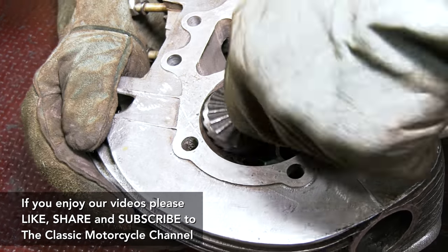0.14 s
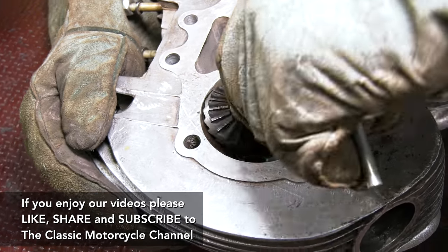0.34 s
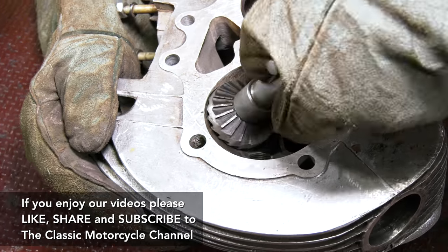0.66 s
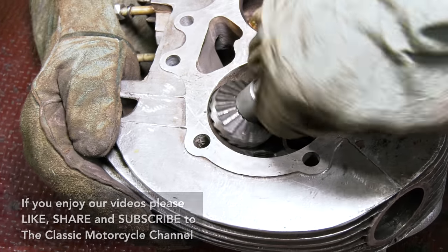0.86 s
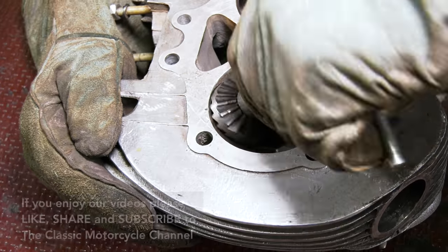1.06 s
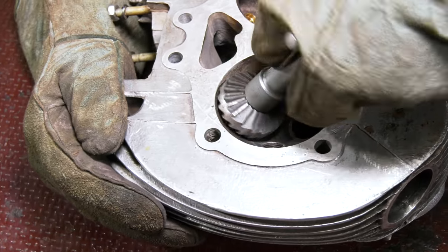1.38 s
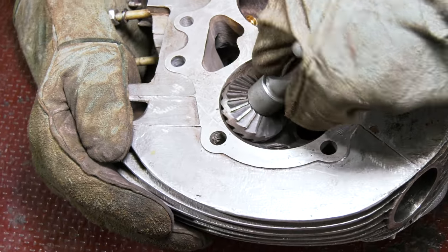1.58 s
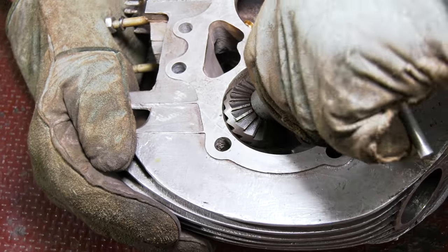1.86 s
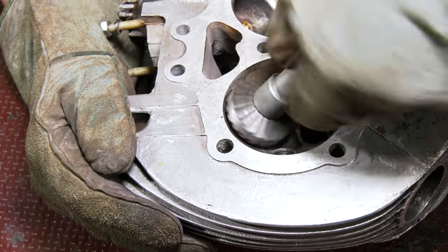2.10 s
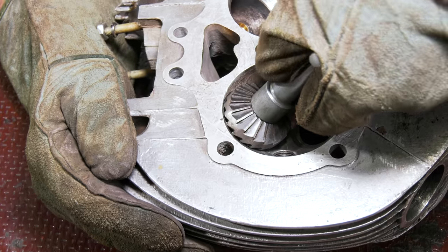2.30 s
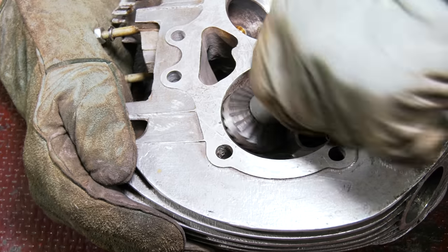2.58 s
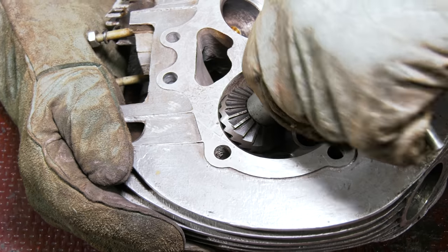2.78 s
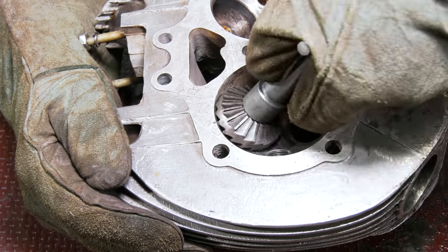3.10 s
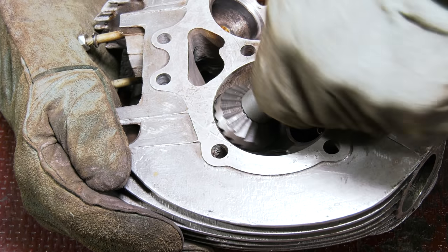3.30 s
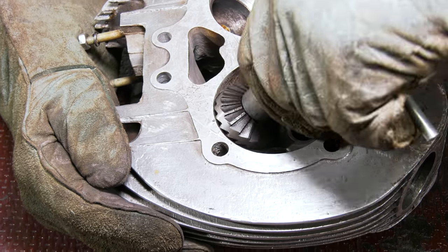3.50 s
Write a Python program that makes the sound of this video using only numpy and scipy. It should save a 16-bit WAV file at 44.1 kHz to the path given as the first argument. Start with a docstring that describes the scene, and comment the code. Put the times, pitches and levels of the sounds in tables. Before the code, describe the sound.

A hand-turned steel cutter grinds on a metal casting: five gritty, ringing rasps about 0.8 seconds apart, separated by hollow handle clunks and faint scratches, close-miked in a quiet workshop.

```python
"""In a quiet workshop, a toothed steel cutter is turned by hand on a valve seat in a cast metal cylinder head.
Friction noise, clumped by breaking chips, makes each of five turns rasp, ring the metal and rumble the bench.
Between turns the gloved hand lets go and grips the handle again: short pushes thump a hollow body.
Light scratches, metal catches, dry snaps and glove rubs join in; a decaying noise tail gives the room's
answer, and coloured noise makes the background hum."""
import sys
import numpy as np
from scipy import signal
from scipy.fft import rfft, irfft, next_fast_len
from scipy.io import wavfile
from scipy.ndimage import uniform_filter1d, map_coordinates

SR = 44100
rng = np.random.default_rng(int(sys.argv[2]) if len(sys.argv) > 2 else 0)


def makeup_ratio(level_db):
    """Linear amplitude ratio for a level in decibels (20 dB per factor of ten)."""
    decades = np.asarray(level_db, float) / 20
    return 10 ** decades


def wav_record(signal):
    """Record a signal, one row per channel, as 16-bit PCM in the file named by sys.argv[1]."""
    frames = np.transpose(np.atleast_2d(signal))
    bounded = np.clip(frames, -1, 1)
    # unit amplitude maps onto the largest positive 16-bit level
    quanta = np.round(bounded * 32767).astype(np.int16)
    wavfile.write(sys.argv[1], SR, quanta)


N = 160965  # length in samples

# The cut, one list a turn. Each row: time in seconds, rasp control level in dB,
# weight on the bench in dB over that level, bite into the casting in dB over that level.
TURNS = [
    [(0.0, -68, 21.5, 21.5), (0.058, -70.5, 21, 17), (0.07, -54.5, 14.5, 20), (0.106, -51.5, 19, 19),
     (0.17, -50, 17, 19), (0.212, -53, 20.5, 17), (0.232, -47.5, 18.5, 18.5), (0.296, -42, 16.5, 22.5),
     (0.345, -49, 14.5, 14.5), (0.362, -57, 18, 16), (0.42, -67.5, 9, 15), (0.458, -57.5, 10, -16),
     (0.488, -71.5, 16, 8), (0.51, -49, 24, 19.5), (0.552, -59.5, 1, -9), (0.572, -51.5, 13.5, 10.5),
     (0.652, -89, -5, 23), (0.69, -66.5, 38, 19), (0.71, -81, 25, -3), (0.73, -70, 17, -15),
     (0.754, -55.5, 11.5, -18), (0.84, -71, -3, -12)],
    [(0.845, -66, -2, -7), (0.877, -53, 16, 17), (0.901, -45, 16.5, 18.5), (1.029, -41, 15, 17),
     (1.085, -39.5, 15.5, 19), (1.132, -49.5, 14.5, 13.5), (1.142, -57, 18, 19), (1.159, -64, 7, 20),
     (1.201, -60.5, 33, 9), (1.273, -61, -11, -19), (1.293, -51, 20.5, 21), (1.371, -56.5, 6, -4),
     (1.433, -77, -1, 18), (1.467, -70, 10, -16), (1.489, -57, 13, 24), (1.547, -76, 22, 17),
     (1.559, -64, 16, 5), (1.593, -80, 37, 13), (1.607, -75, 2, 1), (1.62, -80, 8, 16)],
    [(1.625, -76, 12, 10), (1.669, -49, 16.5, 19.5), (1.719, -42, 10.5, 17), (1.737, -45.5, 18, 16.5),
     (1.815, -38.5, 16.5, 17.5), (1.861, -37.5, 17, 18), (1.951, -59.5, 14, 11), (2.025, -63.5, 11, 12),
     (2.057, -82, 17, -4), (2.069, -59, 19.5, 25), (2.141, -56.5, 10, -5), (2.179, -52, 5.5, -1),
     (2.215, -67, 18, 10), (2.241, -62, 18, 5), (2.257, -49, 8, 16), (2.277, -57, 18, 23.5),
     (2.391, -58.5, 9, 3), (2.4, -57, 18, 2)],
    [(2.405, -61.5, 5, 10), (2.453, -47, 13.5, 17), (2.493, -40, 13.5, 12), (2.589, -41.5, 16.5, 17),
     (2.631, -32.5, 12, 11), (2.707, -43, 11, 13), (2.737, -61.5, 16, 15), (2.775, -56.5, -8, 9),
     (2.795, -66, 14, 21), (2.849, -56, 5, -3), (2.875, -56.5, -2, -14), (2.891, -50, 22, 0),
     (2.913, -46, 10, 11.5), (3.009, -60, 8.5, -3), (3.037, -63.5, 35.5, 26), (3.093, -80, 23, 0),
     (3.117, -73, -10, -13), (3.18, -83, -1, 4)],
    [(3.185, -81, 8, -14), (3.227, -58, -3, 12), (3.243, -53.5, 13.5, 20), (3.267, -39.5, 12, 12),
     (3.305, -39.5, 13.5, 17.5), (3.331, -41, 15.5, 20), (3.347, -36.5, 12, 18.5), (3.377, -40, 12.5, 13),
     (3.389, -41.5, 16.5, 9), (3.423, -36, 13.5, 15), (3.451, -38, 17.5, 7.5), (3.485, -45, 13.5, 12),
     (3.515, -64.5, 23, 16), (3.561, -68, 22, 2), (3.641, -60, 14.5, -2), (3.65, -61, 15, 1)],
]
# Pitches in Hz of the ringing modes of casting and cutter.
METAL_HZ = [1780, 2222, 2306, 2519, 2622, 2738, 3115, 3205, 3300, 3685, 3841, 4290, 4640, 4904, 5408, 5619,
            5780, 6245]
# The same modes in order. Each row: free time to fall 60 dB in seconds,
# relative level in dB when rasped, at a release, and at a grip.
METAL_MODES = [(0.028, -20, -24, -5.5), (0.57, 8.5, -13, -6.5), (0.25, -16, -6, -4), (0.28, 0.5, -22, -21),
               (0.051, 2.5, 1, -17), (0.054, -1.5, 9.5, -4), (0.38, -8, -16, -19), (0.44, -11, -14, -17),
               (0.35, -6, -9, -28), (0.14, -22, 1, -15), (0.33, -4.5, -2, -17), (0.029, -21.5, 0, -23),
               (0.23, -10, -26, -25), (0.55, -7, -23, -24), (0.24, -11.5, -28, -34), (0.64, -12, -41, -23),
               (0.26, -12, -36, -29), (0.1, -20.5, -25, -30)]
# High resonances of the teeth. Each row: pitch in Hz, width in Hz, relative level in dB.
TEETH_PEAKS = [(6400, 34, -11), (6920, 26, 2.5), (7100, 17, -15), (8070, 500, -12.5), (8530, 20, 0),
               (9040, 56, -2.5), (9350, 80, -7.5), (10080, 430, -7), (11000, 78, -3.5), (11030, 98, -11),
               (11750, 53, -5.5), (12700, 45, -4), (13600, 61, -10), (14900, 49, -11)]
# Colour of the rasp. Each row: frequency in Hz, relative level in dB per Hz.
RASP_COLOUR = [(410, -77), (700, -7), (1030, -5), (1450, -15), (2260, -3.5), (2700, -8), (3390, -26.5),
               (3520, -24), (4750, -15.5), (7400, -26), (12300, -28), (15800, -40)]
# Colour of the bench rumble. Each row: frequency in Hz, relative level in dB per Hz.
BENCH_COLOUR = [(15, -51), (25, -27.5), (68, -8), (156, -7), (316, -6), (356, -1.5), (810, -6.5),
                (1030, -6.5), (1500, -10), (1950, -10), (3300, -120)]
# Resonances of the bench. Each row: pitch in Hz, width in Hz, relative level in dB.
BENCH_MODES = [(108.3, 54, -8), (250, 63, 4), (373.6, 13, -5), (417, 56, -6), (617, 24, -3.5),
               (903, 43, -8.5)]
# The teeth skate lightly back over the seat.
# Each row: peak time in seconds, level in dB, rise in seconds, fall in seconds.
SKATES = [(.52, -46, 0.0077, 0.072), (.755, -52, 0.019, 0.053), (1.33, -49.5, 0.035, 0.067),
          (2.13, -45.5, 0.032, 0.056), (2.91, -35, 0.041, 0.041)]
# Resonances of the skating scratch. Each row: pitch in Hz, width in Hz, relative level in dB.
SKATE_PEAKS = [(2500, 700, -1), (3700, 120, -2), (4500, 400, 0), (5010, 400, -1), (6300, 900, -7),
               (8060, 120, -9), (9250, 120, -7), (9900, 300, -10)]
# A tooth catches and the casting rings free. Each row: start in seconds, ring level in dB.
SNAGS = [(.262, -20.5), (.3, -18), (1.0, -40), (1.075, -28), (1.78, -14.5), (1.826, -20), (1.862, -39),
         (2.642, -12), (3.305, -22), (3.495, -30.5)]
# A chip snaps. Each row: start in seconds, peak in dB, pitch in Hz.
TICKS = [(.347, -21, 1400), (1.134, -22, 1600), (1.187, -24, 900), (1.297, -21, 3000), (1.359, -27, 2500),
         (1.59, -29, 1000), (3.428, -14, 2000)]
# The hand lets go and the handle rocks. Each row: start in seconds, thump peak in dB, ring in dB over the
# thump, ring brightness in dB per octave, thump brightness in dB per octave.
RELEASES = [(.5, -23, -42, -5, -2), (.5065, -16.5, -16.5, -19, -2), (1.294, -20, -24, -2, -10),
            (1.298, -7.5, -43, -11, 6.5), (2.068, -33, -14, 9, 13), (2.0715, -7.5, -16.5, -4.5, 2)]
# The palm takes the handle again. Each row: start in seconds, thump peak in dB, ring in dB over the
# thump, ring brightness in dB per octave, thump brightness in dB per octave.
GRIPS = [(.684, -10.5, -46, 6, -10), (1.49, -4, -18.5, -7, 1.5), (2.2515, -3, -13, -5, 2),
         (2.893, -20, -17, 0, -1), (2.9, -10.5, -21, 1, -4), (3.03, -6, -30.5, -17, -1.5)]
# Hollow body at a release. Each row: pitch in Hz, width in Hz, relative level in dB.
RELEASE_BODY = [(133, 98, 0.5), (770, 200, -2.5), (1140, 160, 5)]
# Hollow body at a grip. Each row: pitch in Hz, width in Hz, relative level in dB.
GRIP_BODY = [(681, 180, 11), (1004, 238, 10.5), (1246, 196, 1.5), (1686, 210, -2.5)]
# Colour of the bench after a knock. Each row: frequency in Hz, relative level in dB per Hz.
SCUFFLE_COLOUR = [(35, -49), (60, 7), (219, 9), (295, -1), (639, 7.5), (1810, -18), (2100, -27),
                  (2730, -59), (4620, -120)]
# Colour of the loose cutter after a blow. Each row: frequency in Hz, relative level in dB per Hz.
CLATTER_COLOUR = [(1200, -49), (2200, 0.5), (3900, 0.5), (6200, -8), (7500, -29), (15000, -28)]
# The glove rubs the handle. Each row: start in seconds, level in dB, time to fall 60 dB in seconds.
RUBS = [(1.187, -26, 0.43), (2.93, -48, .15)]
# Colour of the glove rubs. Each row: frequency in Hz, relative level in dB per Hz.
RUB_COLOUR = [(88, -50), (150, -22), (260, -5), (489, -9), (571, 5), (1240, -4), (2600, -14), (3380, -24),
              (5720, -120)]
# How fast the room's answer dies. Each row: frequency in Hz, time to fall 60 dB in seconds.
ROOM_DECAY = [(200, 0.73), (2000, 0.056), (10000, 0.27)]
# Colour of the workshop's hum. Each row: frequency in Hz, relative level in dB per Hz.
SHOP_COLOUR = [(15, -25), (25, 4), (291, -10.5), (977, -6.5), (1150, -6), (1550, -14), (1770, -12),
               (1970, -16), (3970, -21.5), (11700, -30), (15700, -36)]

CHIPS_PER_S, CHIP_SPREAD_DB, CHIP_SHARE = 2200, 4, 0.55  # share of the power; the rest is hiss
CLUMP_PER_S, CLUMP_DEPTH = 70, 0.6  # chips come in bunches
RING_DB, TEETH_DB, RASP_DB = 1, -3.5, 10.5  # added to the rasp control level
FLUTTER_DB = 1.2
CHATTER_DB, CHATTER_PER_S = 1.7, 150
PRESSED = 0.2  # share of the free ring time left under the teeth
SHIFT = 0.0028  # scale of the pitch shift as the cutter's seat moves
BENCH_FLAT = 0.71  # share that passes between the bench's modes
PATCH_DB = 2  # strength of the random gain patches
CONTACT_S, CRACK_HZ = 0.0011, 3500
CLATTER_DB, CLATTER_T60_S = -10.5, 0.14  # over the ring
SCUFFLE_DB, SCUFFLE_T60_S = -26.5, 0.29  # over the thump
ROOM_DB, SHOP_DB = -17, -46.5
CLIP, TOP_HZ = 0.6, 15750  # peak limit in full scale, highest frequency kept


def unit(x):
    """Scales a sound to rms 1."""
    return x / np.sqrt(np.mean(x ** 2) + 1e-20)


def along(points, hz):
    """Reads a curve of (Hz, value) points on a log frequency axis."""
    f, v = np.transpose(points)
    return np.interp(np.log(hz + 1), np.log(f + 1), v)


def wobble(rate):
    """Draws a smooth random curve with the given number of knots a second."""
    knots = rng.standard_normal(int(N * rate / SR) + 4)
    return map_coordinates(knots, [np.arange(N) * rate / SR])


def filtered(x, response):
    """Shapes a sound by a complex response of frequency."""
    m = next_fast_len(len(x) + SR // 2)
    return irfft(rfft(x, m) * response(np.fft.rfftfreq(m, 1 / SR)), m)[:len(x)]


def coloured(x, spectrum):
    """Gives a sound a (Hz, dB) colour and rms 1."""
    return unit(filtered(x, lambda hz: makeup_ratio(along(spectrum, hz))))


def resonances(peaks):
    """Response of resonances, each (Hz, width Hz, peak dB), with alternating sign."""
    def response(f):
        total = 0
        for k, (hz, width, db) in enumerate(peaks):
            damping = 1j * f * width
            total = total + (-1) ** k * makeup_ratio(db) * damping / (hz * hz - f * f + damping)
        return total
    return response


def patchy(x, size):
    """Lets resonances come and go: a random gain over time and frequency."""
    z = signal.stft(x, nperseg=size)[2]
    field = uniform_filter1d(rng.standard_normal(z.shape), size=3, axis=0)
    field = uniform_filter1d(field, size=5, axis=1)
    return signal.istft(z * makeup_ratio(PATCH_DB * unit(field)), nperseg=size)[1][:N]


def chips():
    """Friction force: hiss mixed with bunches of small chip impulses of uneven size and random sign."""
    spread = np.clip(rng.standard_normal(N), -2, 2)
    size = makeup_ratio(CHIP_SPREAD_DB * spread) * rng.choice([-1, 1], N)
    rate = CHIPS_PER_S * np.exp(CLUMP_DEPTH * wobble(CLUMP_PER_S))
    breaks = unit(size * (rng.random(N) < rate / SR))
    return np.sqrt(CHIP_SHARE) * breaks + np.sqrt(1 - CHIP_SHARE) * rng.standard_normal(N)


def metal_and_teeth(rasp_db, bite_db, chatter_db):
    """Friction rings the damped metal and the teeth while the cutter shifts between two seat positions."""
    seat = np.pi / 4 + 0.5 * np.tanh(wobble(15))
    ring = teeth = 0
    for side, share in ((-1.4, np.sin(seat)), (-0.37, np.cos(seat))):
        force = chips() * share * makeup_ratio(chatter_db)
        modes = []
        for hz, (t60, db, *_) in zip(METAL_HZ, METAL_MODES):
            shifted = hz * (1 + side * SHIFT * (t60 < 0.2))  # only short-lived modes move
            width = np.log(1000) / (np.pi * t60 * PRESSED)
            modes.append((shifted, width, db))
        metal = resonances(modes)
        driven = filtered(force * makeup_ratio(rasp_db + bite_db + RING_DB), metal)
        ring = ring + driven / np.std(filtered(force, metal))
        tips = resonances([(hz * (1 + side * SHIFT), width, db) for hz, width, db in TEETH_PEAKS])
        teeth = teeth + unit(filtered(force, tips)) * makeup_ratio(rasp_db + TEETH_DB)
    return 0.58 * (patchy(ring, size=512) + teeth)


def rasp(rasp_db):
    """The scrape itself: patchy, coloured friction noise that follows the cut."""
    scrape = coloured(patchy(chips(), size=512), RASP_COLOUR)
    return scrape * makeup_ratio(rasp_db + RASP_DB + FLUTTER_DB * wobble(60))


def bench(rasp_db, weight_db, chatter_db):
    """The bench rumbles as noise passes through its broad resonances."""
    noise = patchy(rng.standard_normal(N), size=1024)
    shake = filtered(noise, lambda f: BENCH_FLAT + np.abs(resonances(BENCH_MODES)(f)))
    level_db = rasp_db + weight_db + chatter_db + FLUTTER_DB * wobble(30.02)
    return coloured(shake, BENCH_COLOUR) * makeup_ratio(level_db)


def cutter():
    """The turning cutter drives rasp, metal, teeth and bench with one set of moving levels."""
    s, *columns = np.vstack(TURNS).T
    rasp_db, weight_db, bite_db = [np.interp(np.arange(N) / SR, s, c) for c in columns]
    rasp_db = rasp_db + FLUTTER_DB * wobble(45)
    chatter_db = CHATTER_DB * wobble(CHATTER_PER_S)
    metal = metal_and_teeth(rasp_db, bite_db, chatter_db)
    return metal + rasp(rasp_db) + bench(rasp_db, weight_db, chatter_db)


def skates():
    """Friction through high resonances makes a thin bright scratch that swells and fades."""
    t = np.arange(N) / SR
    shape = 0
    for s, db, rise, fall in SKATES:
        shape = shape + makeup_ratio(db) * np.exp(-(((t - s) / np.where(t < s, rise, fall)) ** 2))
    scratch = filtered(chips(), lambda f: resonances(SKATE_PEAKS)(f) * f / (f + 1500))  # less bass
    return unit(patchy(scratch, size=256)) * shape


def ringing(t, column, hard_db):
    """The metal's free modes die as sines of alternating sign; a higher hard_db favours high ones."""
    total = 0
    for k, (hz, mode) in enumerate(zip(METAL_HZ, METAL_MODES)):
        level_db = mode[column] + hard_db * np.log2(hz / METAL_HZ[1])
        total = total + (-1) ** k * makeup_ratio(level_db - 60 * t / mode[0]) * np.sin(2 * np.pi * hz * t)
    return total


def snags():
    """Catches under the rasp start softly and leave the casting ringing."""
    out, t = np.zeros(N + SR), np.arange(SR // 2) / SR
    for s, db in SNAGS:
        rise = 1 - np.exp(-t / 0.0038)
        out[round(s * SR):][:len(t)] += makeup_ratio(db) * ringing(t, column=3, hard_db=-29) * rise
    return out[:N]


def ticks():
    """Chips snap as dry, fast-fading noise through one wide resonance applied twice."""
    out, t = np.zeros(N), np.arange(SR // 50) / SR
    for s, db, hz in TICKS:
        burst = makeup_ratio(-60 * t / 0.004) * rng.standard_normal(len(t))
        snap = filtered(burst, lambda f: resonances([(hz, 1.6 * hz, 0)])(f) ** 2)
        out[round(s * SR):][:len(t)] += makeup_ratio(db) * snap / np.abs(snap).max()
    return out


def hollow_body(body, clack_db):
    """Response of a hollow body; clack_db per octave raises or lowers its modes above 700 Hz."""
    def response(f):
        total = 0
        for hz, width, db in body:
            bright_db = clack_db * max(np.log2(hz / 700), 0)
            total = total + makeup_ratio(db + bright_db) * resonances([(hz, width, 0)])(f) ** 2
        return total
    return response


def knocks(rows, body, column):
    """A building contact thumps the body, rings the metal, rattles the cutter and shakes the bench."""
    out, t = np.zeros(N + SR), np.arange(SR // 2) / SR
    shake = coloured(rng.standard_normal(N + SR), SCUFFLE_COLOUR)
    rattle = coloured(chips(), CLATTER_COLOUR)
    u = t / CONTACT_S
    rise, pulse = 1 - np.exp(-u), u * np.exp(-u)
    for s, db, ring_db, hard_db, clack_db in rows:
        i = round(s * SR)
        push = np.exp(-t / 0.00013) + 0.011 * pulse * rng.standard_normal(len(t))
        thump = filtered(push, hollow_body(body, clack_db))
        crack = filtered(pulse * rng.standard_normal(len(t)), lambda f: 1 / (1 + 1j * f / CRACK_HZ) ** 2)
        clatter = rattle[i:i + len(t)] * makeup_ratio(CLATTER_DB - 60 * t / CLATTER_T60_S) * rise
        ring = ringing(t, column, hard_db) * rise ** 2 + 2.06 * crack + clatter
        scuffle = shake[i:i + len(t)] * makeup_ratio(SCUFFLE_DB - 60 * t / SCUFFLE_T60_S) * rise
        out[i:i + len(t)] += makeup_ratio(db) * (thump / np.abs(thump).max() + makeup_ratio(ring_db) * ring + scuffle)
    return out[:N]


def rubs():
    """Glove friction is soft coloured noise that starts quickly, fades and flutters."""
    t = np.arange(N) / SR
    shape = 0
    for s, db, t60 in RUBS:
        start = np.clip((t - s) / 0.0013, 0, 1)
        shape = shape + makeup_ratio(db - 60 * np.abs(t - s) / t60) * start
    return coloured(chips(), RUB_COLOUR) * shape * makeup_ratio(2 * wobble(120))


def room(x):
    """The workshop answers with a noise tail in which each frequency dies at its own speed."""
    hz, t, z = signal.stft(rng.standard_normal(SR // 2), SR, nperseg=256)
    fade = makeup_ratio(-60 * t / along(ROOM_DECAY, hz)[:, None])
    tail = signal.istft(z * fade, SR, nperseg=256)[1]
    late = np.pad(x, (300, 0))  # delay in samples
    return signal.fftconvolve(late, tail / np.linalg.norm(tail))[:N]


def workshop():
    """The quiet background hum is coloured noise with a slowly wandering level."""
    return coloured(rng.standard_normal(N), SHOP_COLOUR) * makeup_ratio(SHOP_DB + 2.4 * wobble(4.45))


def scene():
    """Adds the work, the room's answer to it and the workshop's hum."""
    hands = knocks(RELEASES, RELEASE_BODY, column=2) + knocks(GRIPS, GRIP_BODY, column=3) + rubs()
    work = cutter() + skates() + snags() + ticks() + hands
    return (work + makeup_ratio(ROOM_DB) * room(work) + workshop())[None]


def top_cut(x):
    """Nothing passes above the cut-off."""
    return signal.sosfilt(signal.butter(12, 15980, fs=SR, output="sos"), x)


def record(dry):
    """Rounds off the peaks and removes everything from TOP_HZ up."""
    soft = dry[0] / (1 + np.abs(dry[0] / CLIP) ** 4) ** 0.25
    mix = filtered(soft, lambda hz: hz < TOP_HZ)[None]
    return top_cut(mix)


dry = scene()
out = record(dry)
wav_record(out)
```